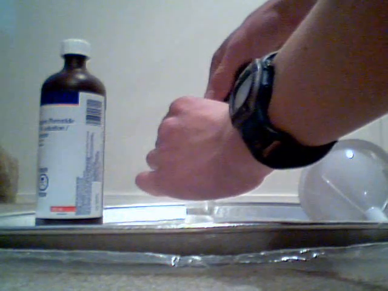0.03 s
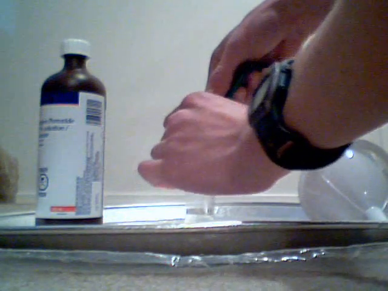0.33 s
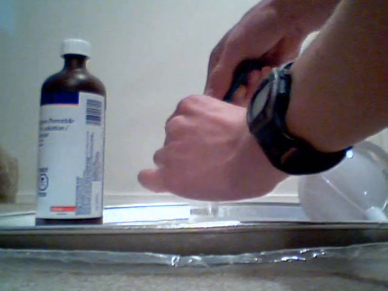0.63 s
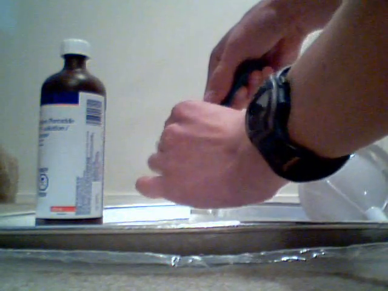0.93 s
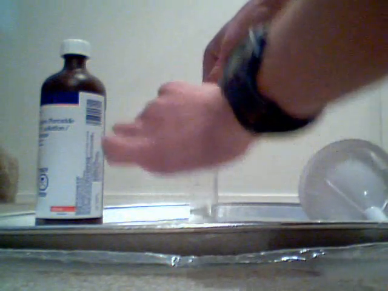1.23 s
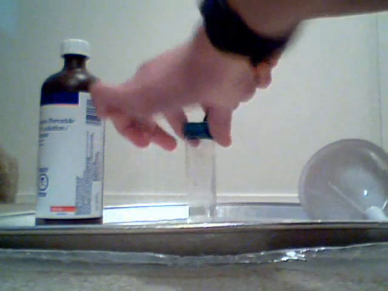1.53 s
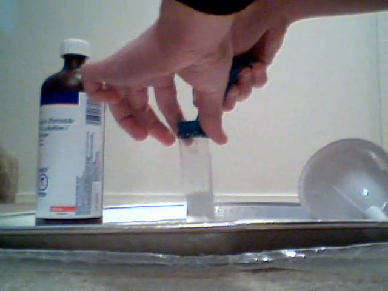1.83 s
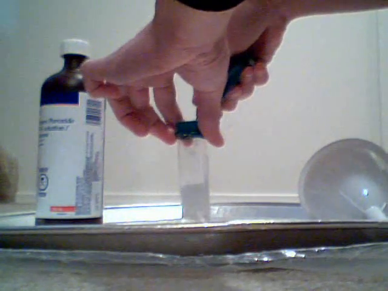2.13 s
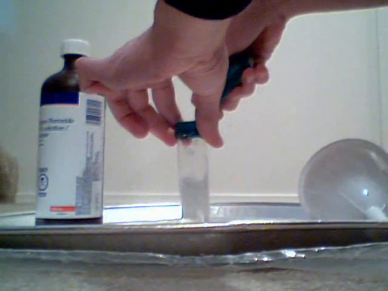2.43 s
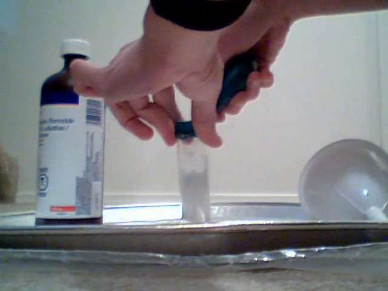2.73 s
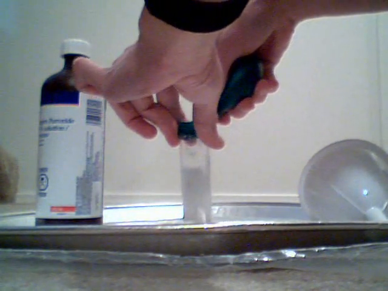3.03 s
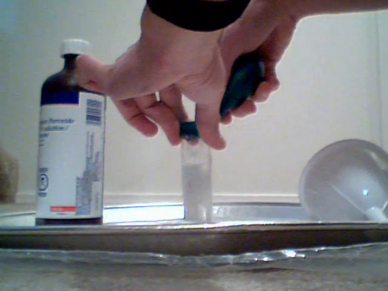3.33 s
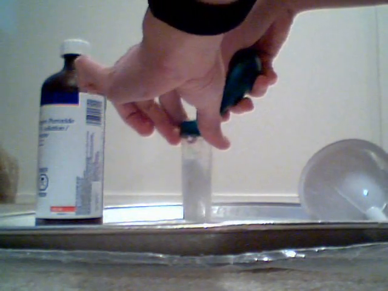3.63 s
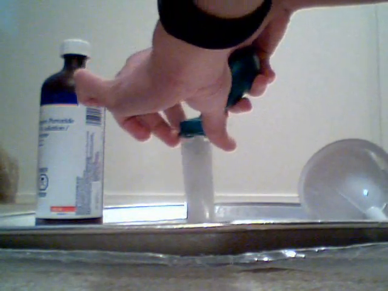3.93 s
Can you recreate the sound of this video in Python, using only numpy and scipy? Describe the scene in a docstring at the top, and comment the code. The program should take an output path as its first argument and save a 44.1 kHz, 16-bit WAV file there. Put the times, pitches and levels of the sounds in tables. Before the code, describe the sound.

Faint, dull pops and taps come from liquid foaming in a capped vial held on a tray, sparse at first, then more frequent. Hands rustle softly in a small room, over steady microphone hiss, low rumble and a thin whine.

```python
"""Liquid foams up in a capped vial held down on a tray: small dull pops and taps come more often
as the reaction builds, each a short pulse that leaves vial and tray ringing over faint bubbles.
Hands rustle softly on the vial, and the nearby walls add a short tail.
Under it all lie a low room rumble and the steady hiss and thin electrical whine of a cheap microphone."""
import sys
import numpy as np
from scipy import signal
from scipy.fft import rfft, irfft
from scipy.io import wavfile

SR = 44100
rng = np.random.default_rng(int(sys.argv[2]) if len(sys.argv) > 2 else 0)


def wav_out(sig):
    """Save sig, one row per channel (or a flat mono array), as 16-bit PCM at SR to the path in sys.argv[1]."""
    wavfile.write(sys.argv[1], SR, np.round(np.clip(np.atleast_2d(sig).T, -1, 1) * 32767).astype(np.int16))


N = 4 * SR


def amp(db):
    """Decibels to gain."""
    return 10 ** (np.asarray(db) / 20)


def unit(x):
    """Scales to rms 1."""
    return x / np.sqrt(np.mean(x ** 2) + 1e-20)


def add(mix, start_s, sound):
    """Mixes a sound in at its start time."""
    part = mix[max(round(start_s * SR), 0):][:len(sound)]
    part += sound[:len(part)]


def filtered(x, kind, cutoff_hz, order=2):
    """Butterworth low-, high- or band-pass."""
    return signal.sosfilt(signal.butter(order, cutoff_hz, kind, fs=SR, output="sos"), x)


def wander(rate_hz):
    """Smooth random modulation of rms 1."""
    f = np.fft.rfftfreq(N, 1 / SR)
    return unit(irfft(rfft(rng.standard_normal(N)) * np.exp(-(f / rate_hz) ** 2), N))


# EQ curve of the noise bed: frequency_hz, relative_level_db
NOISE_EQ = [(8, -5), (20, 2), (60, 0.5), (110, 0), (170, -2.15), (250, -2), (400, -4.5), (600, -6),
            (1200, -8), (1600, -9.5), (2400, -9.5), (5000, -10.5), (6200, -11), (6800, -13.5), (7400, -18),
            (7900, -24), (8400, -31.5)]
# Fast tremolo on the hiss: rate_hz, depth_db
HISS_FLUTTER = [(20, 0.88), (40.6, 0.63)]


def hiss_and_rumble(level_db=-53.5, crossover_hz=290):
    """Microphone hiss with a slight quick flutter, over a room rumble that wavers a little."""
    f, t = np.fft.rfftfreq(N, 1 / SR), np.arange(N) / SR
    eq_hz, eq_db = np.transpose(NOISE_EQ)
    eq = amp(np.interp(np.log(f + 1), np.log(eq_hz + 1), eq_db))
    spectrum = eq * np.exp(2j * np.pi * rng.random(len(f)))
    low_share = 1 / (1 + (f / crossover_hz) ** 2)
    flutter_db = sum(depth_db * np.sin(2 * np.pi * hz * t) for hz, depth_db in HISS_FLUTTER)
    flicker_db = 0.63 * wander(rate_hz=90)
    waver_db = 1.34 * wander(rate_hz=24)
    hiss = irfft(spectrum * (1 - low_share), N) * amp(flutter_db + flicker_db)
    rumble = irfft(spectrum * low_share, N) * amp(waver_db)
    return amp(level_db) * unit(hiss + rumble)


# Tones of the microphone's whine: pitch_hz, rms_level_db
WHINE_TONES = [(694, -74.5), (1388, -72.5), (2082, -71.5), (2505, -80.5), (2776, -72.5), (2816, -81.5),
               (3510, -81), (3822, -81), (4032, -71), (4857, -73.5), (5551, -72.5), (5592, -76),
               (6024.6, -64), (6245, -78.5), (6286, -78.5), (6980, -82)]


def whine(drift_hz=0.6):
    """Thin steady electrical tones that barely drift."""
    out = np.zeros(N)
    for pitch_hz, level_db in WHINE_TONES:
        cycles = np.cumsum(pitch_hz + drift_hz * wander(rate_hz=1.96)) / SR + rng.random()
        out += amp(level_db) * np.sqrt(2) * np.sin(2 * np.pi * cycles)
    return out


def room(x, level_db=-13.5, t60_s=0.26, predelay_s=0.002):
    """A short reverb tail from the nearby walls."""
    t = np.arange(SR // 2) / SR
    tail = rng.standard_normal(len(t)) * amp(-60 * t / t60_s) * (t > predelay_s)
    return amp(level_db) * signal.oaconvolve(x, tail / np.linalg.norm(tail))[:N]


# Swells of rustle as the hands shift: centre_s, half_length_s, level_db
HAND_RUBS = [(0.59, 0.12, -62), (1.877, 0.032, -58), (3.287, 0.12, -61.5), (3.845, 0.081, -64)]


def hands():
    """Skin slides softly on the vial and its cap, making low friction noise."""
    t = np.arange(N) / SR
    swells = sum(amp(level_db) * np.exp(-((t - centre_s) / half_length_s) ** 2)
                 for centre_s, half_length_s, level_db in HAND_RUBS)
    return swells * unit(filtered(rng.standard_normal(N), "band", cutoff_hz=(132, 490)))


def pulse(pitch_hz, decay_s):
    """One pop or bubble: a tone that swells quickly and dies within a few cycles."""
    t = np.arange(SR // 40) / SR
    envelope = t / decay_s * np.exp(1 - t / decay_s)
    return envelope * np.sin(2 * np.pi * pitch_hz * t)


# Level curve of the foaming: time_s, relative_level_db
FOAM_SWELL = [(0, -14), (1.2, -7.5), (1.8, 6.5), (2.25, -0.5), (2.65, -1), (3.3, 4.5), (3.55, -1), (4, -4)]


def foam(level_db=-71, bubbles_per_s=130, spread_db=3, low_hz=577, high_hz=1397):
    """Many faint bubbles burst at random, louder as the liquid foams harder."""
    bubbles = np.zeros(N)
    pitches_hz = np.linspace(low_hz, high_hz, 10)
    for pitch_hz in pitches_hz:
        strength = amp(spread_db * np.minimum(rng.exponential(1, N), 3))
        bursts = rng.random(N) < bubbles_per_s / len(pitches_hz) / SR
        bubbles += signal.oaconvolve(strength * bursts, pulse(pitch_hz, decay_s=0.001))[:N]
    swell_db = np.interp(np.arange(N) / SR, *np.transpose(FOAM_SWELL))
    return unit(bubbles) * amp(level_db + swell_db)


def vial_body(x, low_hz=396, high_hz=1520):
    """The vial and tray pass on only the midrange of each pop."""
    dulled = filtered(x, "low", high_hz, order=5)
    return filtered(dulled, "high", low_hz)


# Resonances of vial and tray, relative to the pop: pitch_hz, level_db, t60_s
VIAL_MODES = [(660, -25, 0.033), (1070, -28.5, 0.053), (1227, -21, 0.12)]


def vial_ring():
    """The vial and tray ring briefly in a few damped modes."""
    t = np.arange(SR // 10) / SR
    return sum(amp(level_db - 60 * t / t60_s) * np.sin(2 * np.pi * pitch_hz * t)
               for pitch_hz, level_db, t60_s in VIAL_MODES)


# Pops and taps going into the vial's body: start_s, level_db, pitch_hz, decay_s
POP_CUES = [(0.34, -46.5, 990, 0.0013), (1.5880, -46, 900, 0.00048), (1.67, -49, 900, 0.00076),
            (1.7624, -40, 910, 0.00048), (1.8548, -47, 1020, .0007), (1.8783, -41.5, 700, 0.00076),
            (1.8857, -49, 500, 0.0007), (2.1223, -49, 1050, 0.00057), (2.1590, -42.5, 1040, 0.00077),
            (2.1998, -47, 1060, .001), (2.2210, -44.5, 1133, 0.0012), (2.4061, -42, 1127, 0.0015),
            (2.9114, -46, 950, .0006), (2.9667, -44.5, 665, 0.00088), (3.1113, -50, 1110, .0007),
            (3.1927, -53, 900, 0.00045), (3.2199, -45, 725, .0008), (3.308, -48, 1040, .001),
            (3.341, -43.5, 1000, 0.00068), (3.3653, -42, 1000, 0.0011), (3.5545, -37.5, 1000, 0.00086),
            (3.6584, -48, 1150, .0007), (3.7250, -32, 990, 0.00025), (3.789, -44, 1300, 0.00074),
            (3.8162, -28, 940, 0.00038), (3.8317, -56, 950, 0.00092), (3.8825, -47, 1100, 0.00083)]


def pops():
    """Each pop or tap is a short pulse that leaves the vial and tray ringing faintly."""
    out, ring = np.zeros(N), vial_ring()
    for start_s, level_db, pitch_hz, decay_s in POP_CUES:
        add(out, start_s, amp(level_db) * pulse(pitch_hz, decay_s))
        add(out, start_s, amp(level_db) * ring)
    return out


def scene():
    """The vial and hands in a small room, over hiss, rumble and whine, in mono."""
    vial = vial_body(pops()) + foam() + hands()
    return (vial + room(vial) + hiss_and_rumble() + whine())[None]


def record(dry):
    """The microphone adds a constant offset and cuts the top end."""
    dc_offset, cutoff_hz = -0.0067, 8430
    high_cut = signal.firwin(511, cutoff_hz, window=("kaiser", 9), fs=SR)
    return signal.oaconvolve(dry + dc_offset, high_cut[None], "same")


dry = scene()
out = record(dry)
wav_out(out)
```